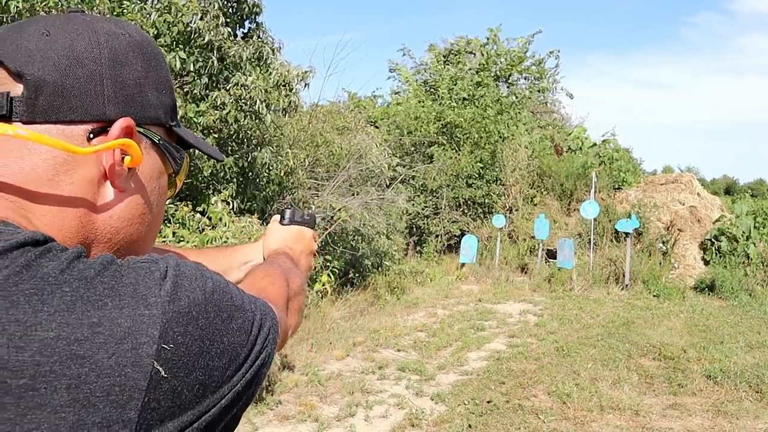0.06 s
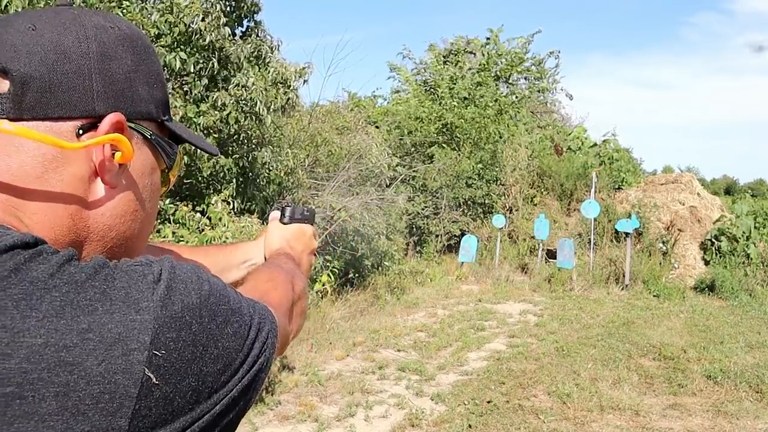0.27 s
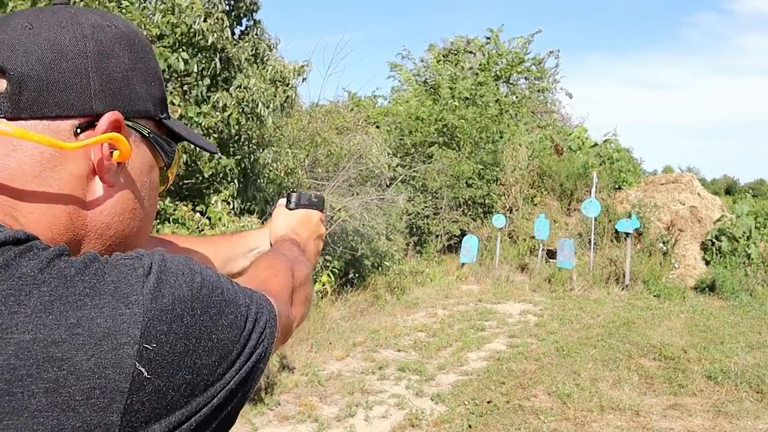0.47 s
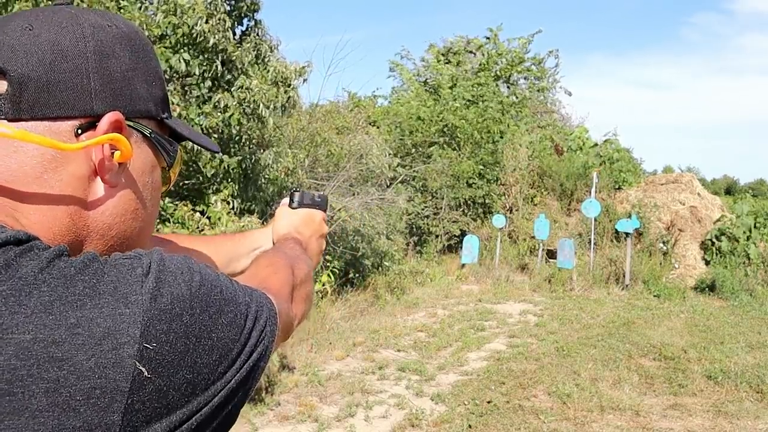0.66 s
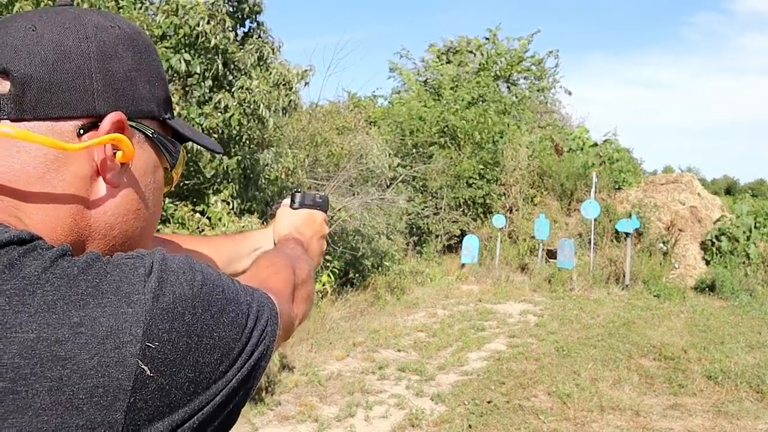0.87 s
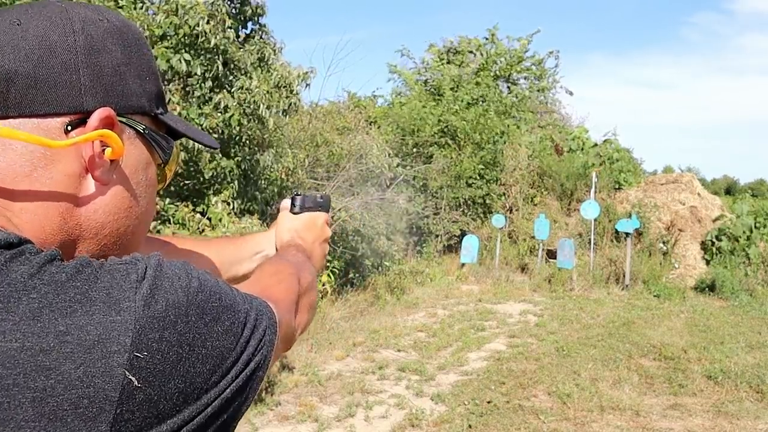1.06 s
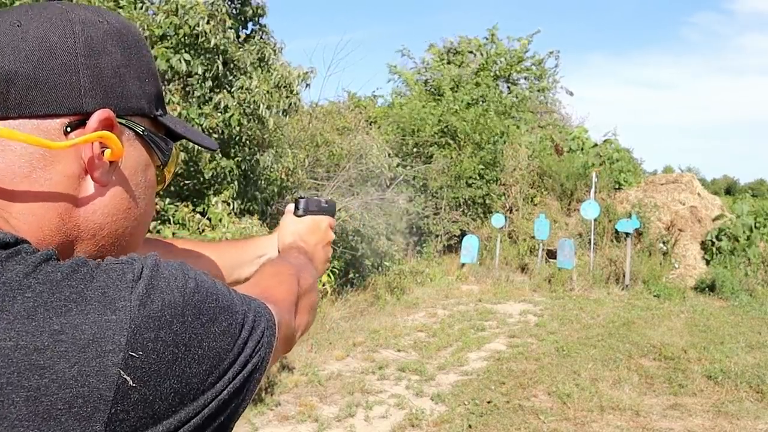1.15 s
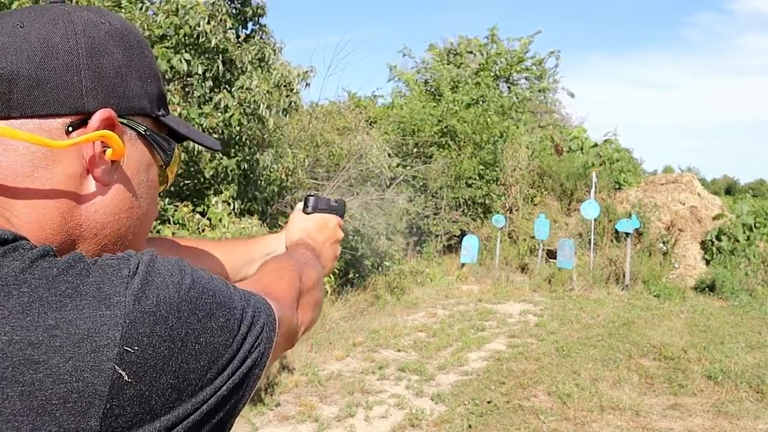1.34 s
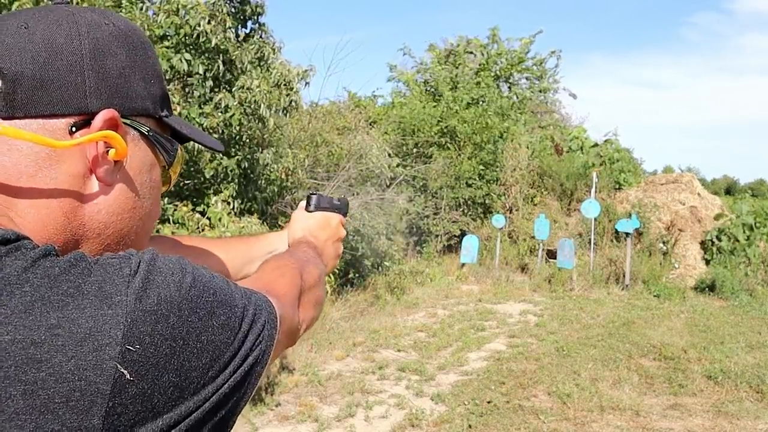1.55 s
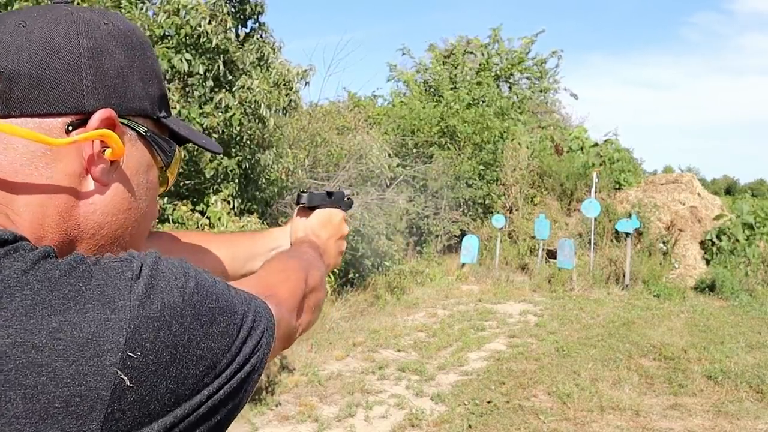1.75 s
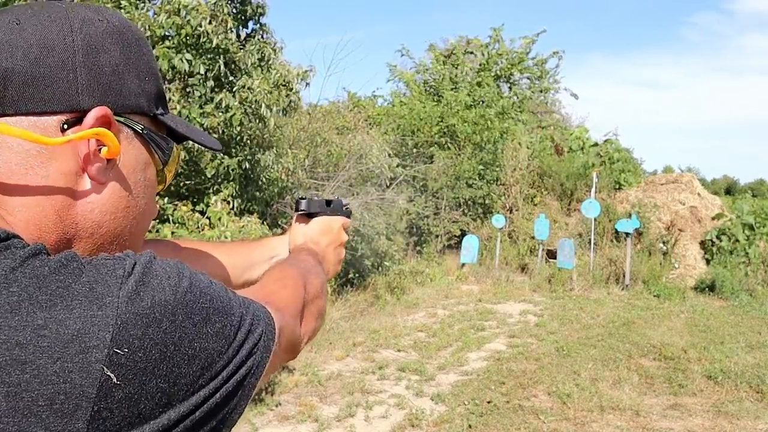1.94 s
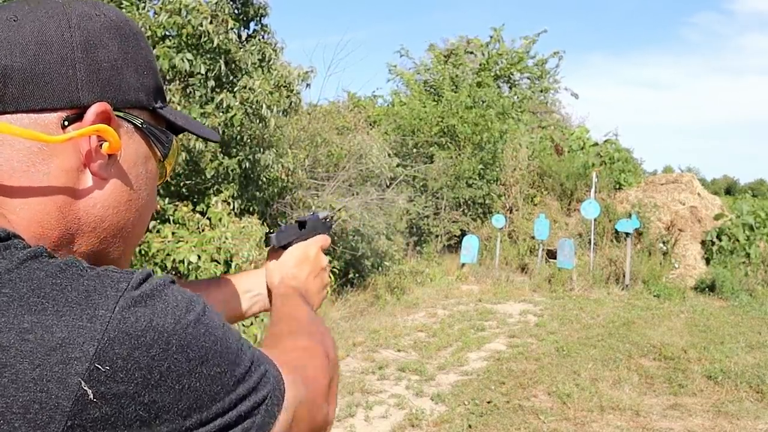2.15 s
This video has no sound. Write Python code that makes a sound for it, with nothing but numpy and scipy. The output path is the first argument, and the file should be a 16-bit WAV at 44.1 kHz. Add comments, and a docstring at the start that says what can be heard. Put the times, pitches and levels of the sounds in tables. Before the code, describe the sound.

Three close pistol shots crack outdoors at about 0.2, 1.0 and 1.7 seconds, after the faint tail of an earlier shot. Each blast overloads the microphone, and a steel target's ring swells just behind it: first a large plate with a longer ring, then a small, higher one, then a medium one. Echoes return from bushes and far trees, and a dull roll fades over light wind.

```python
"""Outdoors, light gusts on the microphone and the tail of a shot fired before the start.
Three pistol shots follow, a step away. Each blast overloads the recorder and bounces off the ground.
The bullets ring steel plates down the range: large, then small, then medium. The limiter ducks at
each shot, so the steel swells as the gain recovers. Echoes return from the bank and bushes,
then from a far line of trees, and a dull roll dies away over the fields."""
import sys
import numpy as np
from scipy import signal
from scipy.fft import rfft, irfft
from scipy.io import wavfile
from scipy.ndimage import minimum_filter1d, map_coordinates

SR = 44100
rng = np.random.default_rng(int(sys.argv[2]) if len(sys.argv) > 2 else 0)


def master_out(mix):
    """Clip the mix to full scale and print it as 16-bit PCM to the path in sys.argv[1]."""
    frames = np.transpose(np.atleast_2d(mix))
    ceiling = np.clip(frames, -1, 1)
    pcm = np.round(ceiling * 32767).astype(np.int16)
    wavfile.write(sys.argv[1], SR, pcm)


N = 97020
T = np.arange(N) / SR


def undb(db):
    """Decibels to gain."""
    return 10 ** (np.asarray(db) / 20)


def noise(colour):
    """Unit-rms noise shaped by (freq_hz, density_db) points."""
    hz, db = np.array(colour, float).T
    bins_hz = np.maximum(np.arange(N // 2 + 1) * SR / N, 1)
    gain = undb(np.interp(np.log(bins_hz), np.log(hz), db))
    shaped = irfft(rfft(rng.standard_normal(N)) * gain, N)
    return shaped / np.std(shaped)


def band(lo_hz, hi_hz):
    """Unit-rms band noise."""
    sos = signal.butter(2, [lo_hz, min(hi_hz, .45 * SR)], "band", fs=SR, output="sos")
    passed = signal.sosfilt(sos, rng.standard_normal(N))
    return passed / np.std(passed)


def fade(start_s, t60_s, rise_s=1e-4):
    """Exponential rise and decay."""
    age_s = np.maximum(T - start_s, 0)
    return (1 - np.exp(-age_s / rise_s)) * np.exp(-np.log(1000) * age_s / t60_s)


def swell(centre_s, sigma_s):
    """Gaussian envelope."""
    return np.exp(-.5 * ((T - centre_s) / sigma_s) ** 2)


def wander(rate_hz):
    """Smooth random motion, spread near 1."""
    knots = rng.standard_normal(64)
    curve = map_coordinates(knots, [T[::100] * rate_hz], order=3, mode="mirror")
    return np.interp(T, T[::100], curve)


def outdoors():
    """Quiet air; light gusts rumble on the microphone."""
    # freq_hz, density_db
    air_colour = [(25, -2), (100, -9.5), (300, -29.5), (700, -2.5), (1300, -14), (2500, -29.5), (4500, -16),
                  (6000, -34.5), (8000, -23), (10000, -33.5), (16000, -50)]
    # centre_s, sigma_s, level_db
    gusts = [(.03, 0.063, -59.5), (.5, 0.21, -62), (0.892, 0.055, -51.5), (1.961, 0.069, -60)]
    air = undb(-56.5 + wander(rate_hz=1.4)) * noise(air_colour)
    wind_gain = sum(undb(db) * swell(centre_s, sigma_s) for centre_s, sigma_s, db in gusts)
    return air + wind_gain * band(25, 170)


def far_echoes(start_s):
    """The far trees return a rustle; a long dull roll crosses the fields."""
    # freq_hz, density_db
    tree_colour = [(60, -25), (300, -13), (700, 21), (1600, 5), (3500, 10.5), (6000, 4), (9000, -1),
                   (13000, -28), (16000, -43)]
    # freq_hz, density_db
    roll_colour = [(60, -13.5), (280, -30.5), (600, 3.5), (1100, -8), (1700, -2), (4000, -17), (8000, -24),
                   (16000, -49)]
    trees = undb(-33) * noise(tree_colour) * fade(start_s + .374, t60_s=.23, rise_s=.018)
    roll = undb(-36.5) * noise(roll_colour) * fade(start_s, t60_s=1.7, rise_s=.1)
    return trees + roll


def near_echoes(start_s, terrain):
    """Bank and bushes return the same dull slaps after every shot."""
    # delay_s, sigma_s, level_db
    slaps = [(.054, .006, 3), (.152, 0.004, -6), (0.17, 0.0039, -16.5), (0.182, .005, -30),
             (0.211, .003, -28), (.222, .004, -37), (0.263, .004, -38), (.291, 0.0037, -33),
             (.324, 0.0051, -36), (0.37, 0.0052, -35), (0.399, 0.0049, -33.5)]
    envelope = sum(undb(db) * swell(start_s + delay_s, sigma_s) for delay_s, sigma_s, db in slaps)
    return np.roll(terrain, int(start_s * SR)) * envelope


def shimmer(start_s, count):
    """Weak upper plate modes at random pitches; higher ones die sooner."""
    lo_hz, hi_hz = 5000, 15400
    out = np.zeros(N)
    first = max(int(start_s * SR), 0)
    age_s = T[first:first + SR // 2] - start_s
    for place, strength, phase in rng.random((count, 3)):
        pitch_hz = lo_hz + place * (hi_hz - lo_hz)
        t60_s = .19 * (hi_hz / pitch_hz) ** .25
        level_db = -10 + 8.5 * (2 * strength - 1)
        envelope = undb(level_db) * np.exp(-np.log(1000) * age_s / t60_s)
        out[first:first + len(age_s)] += envelope * np.sin(2 * np.pi * (pitch_hz * age_s + phase))
    return out


def mode(start_s, pitch_hz, level_db, t60_s):
    """One mode, wavering as the plate swings; lower modes build up more slowly."""
    rise_s = 1e-4 + .018 * max(1 - pitch_hz / 7500, 0)
    tone = np.sin(2 * np.pi * (pitch_hz * (T - start_s) + rng.random()))
    swing_db = 2 * wander(rate_hz=10)
    return undb(level_db + swing_db) * fade(start_s, t60_s, rise_s) * tone


def plate(start_s, size):
    """The bullet splashes on steel, which rings; a larger plate has more modes."""
    # plate modes: pitch_hz, level_db, t60_s
    large = [(842.5, -9.5, 1.55), (1156, -18, .5), (1325, -34, 1.1), (1680, -31, .8), (1784.6, 9, .31),
             (2050, -24, .8), (2277, -21, 1.35), (2575, -32, 1.19), (3013, -18, .44), (3280, -25, 1.),
             (4029, -19, .46), (4259, -14, .42), (4341, 7, .26), (4688, 0, .28), (5180, -6, .49),
             (5346, 10, .34), (5452, -10, .41), (6314, -24, 1.), (6487, 0, .4), (7003, -19, .76),
             (7366, -18, .82), (7547, 13, .22), (7862, -1, .48), (8174, -3, .42), (8312, -4, .27),
             (8944, -23, .8), (8966, -28, .8), (9004, 0, .22), (10189, -18, .55), (10542, -10, .38),
             (10565, -15, .38), (12281, -10, .3), (13020, -14, .4), (13959, -16, .44), (14241, -17, .48)]
    medium = [(1206, -28, 1.5), (1901, 15, .215), (1954, -34, 1.3), (3057, -18, .7), (3298, 3, .22),
              (3662, -13, .68), (3853, -11, .42), (4917, -23, .85), (4921, 11, .28), (5424, -16, .38),
              (6419, 7, .26), (7284, 5, .19), (7565, -2, .2), (9068, 11, .15), (9560, -4, .2),
              (10440, 2, .16), (10823, -7, .2), (13139, -1, .24), (13795, -15, .38)]
    small = [(1993.5, 21, .205), (4484, -12, .84), (7223, -5, .19), (7549, -14, .33), (8182, 11, .12),
             (8212, 11, .2), (8226, 19, .2), (10198, 7, .13), (12542, -13, .5)]
    modes = dict(large=large, medium=medium, small=small)[size]
    splash_hz = 6500
    splash = undb(6) * band(splash_hz, splash_hz * 2.7) * fade(start_s, t60_s=.1)
    ring = sum(mode(start_s, *row) for row in modes)
    return splash + ring + shimmer(start_s, count=2 * len(modes))


def blast(start_s):
    """Muzzle crack and pressure pulses, ground boom, the slide's rasp, scatter from grass and bushes."""
    # muzzle, ground bounce, near objects: delay_s, level_db, positive_phase_s
    pulses = [(.0002, 24, 0.0012), (.0062, 25.5, 0.00069), (.0095, 23.5, 0.00023), (.0320, 23, 0.0007)]
    # freq_hz, density_db
    scatter_colour = [(30, -36), (150, -21), (300, -22.5), (600, -2.5), (1000, -1), (1600, -7.5),
                      (2400, -5.5), (4000, -7.5), (8500, -12.5), (11000, -21), (16000, -28)]
    crack_hz, thump_hz, boom_hz, slide_hz = 7780, 155, 648, 6200
    edge_s = .00014  # rough ground blunts the fronts
    pressure = np.zeros(N)
    for delay_s, level_db, positive_s in pulses:
        age_s = np.maximum(T - start_s - delay_s, 0)
        front = 1 - np.exp(-age_s / edge_s)
        pressure += undb(level_db) * front * (1 - age_s / positive_s) * np.exp(-age_s / positive_s)
    crack = undb(27.5) * band(crack_hz / 4, crack_hz) * fade(start_s, t60_s=.0097)
    thump = undb(6.5) * band(thump_hz * .65, thump_hz * 1.3) * fade(start_s, t60_s=.07, rise_s=.0013)
    boom = undb(16.5) * band(boom_hz / 2, boom_hz * 2) * fade(start_s + .00611, t60_s=.081)
    buffet = undb(-10) * band(30, 228) * swell(start_s + .057, sigma_s=.012)
    slide = undb(12.5) * band(slide_hz, slide_hz * 1.6) * fade(start_s + .012, t60_s=.063)
    scatter = undb(18.5) * noise(scatter_colour) * fade(start_s, t60_s=.21, rise_s=.0037)
    return crack + pressure + thump + boom + buffet + slide + scatter


def scene():
    """Each shot with its echoes and plate, over open air."""
    # start_s, blast_db, echo_db, strike_db, plate_size
    shots = [(-.43, 1, -10.5, 0, "small"), (.2090, 0.5, -4.5, -0.5, "large"),
             (0.9965, -0.5, -2.5, -4, "small"), (1.7421, 1, -1, -3.5, "medium")]
    # freq_hz, density_db
    slap_colour = [(60, -42), (250, -25), (500, -6), (800, 0), (1100, -2), (1600, -19), (3000, -31),
                   (8000, -54), (16000, -75)]
    strike_delay_s = .0472  # bullet's flight plus the sound's way back
    out = outdoors()
    terrain = noise(slap_colour)
    for start_s, blast_db, echo_db, strike_db, plate_size in shots:
        out += undb(blast_db) * blast(start_s)
        out += undb(echo_db) * (near_echoes(start_s, terrain) + far_echoes(start_s))
        out += undb(strike_db) * plate(start_s + strike_delay_s, plate_size)
    return out[None]


def record(dry):
    """A limiter ducks, holds and recovers; what outruns it clips; a low-pass cuts the top."""
    limit_db, max_cut_db, top_hz = -1.5, 27.5, 15750
    attack_s, hold_s, release_db_per_s = .0011, .048, 254.5
    mono = dry[0]
    over_db = np.clip(20 * np.log10(np.abs(mono) + 1e-9) - limit_db, 0, max_cut_db)
    half_hold = int(hold_s * SR / 2)
    held_db = -minimum_filter1d(-over_db, 2 * half_hold + 1, origin=half_hold, mode="nearest")
    ramp_db = release_db_per_s * T
    target_db = np.maximum.accumulate(held_db + ramp_db) - ramp_db
    pole = np.exp(-1 / (attack_s * SR))
    cut_db = signal.lfilter([1 - pole], [1, -pole], target_db)
    clipped = np.clip(mono * undb(-cut_db), -1, 1)
    lowpass = signal.ellip(8, .2, 70, top_hz, fs=SR, output="sos")
    return np.clip(signal.sosfilt(lowpass, clipped), -1, 1)[None]


dry = scene()
out = record(dry)
master_out(out)
```